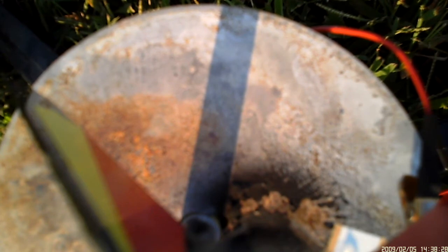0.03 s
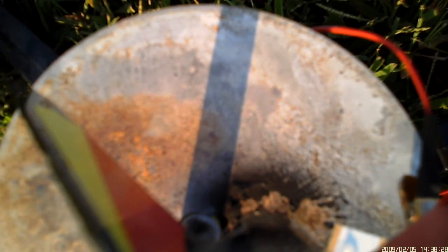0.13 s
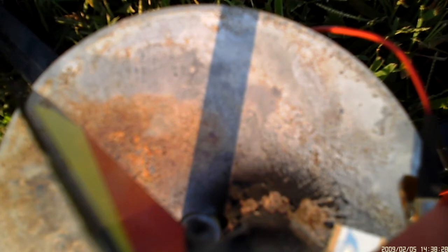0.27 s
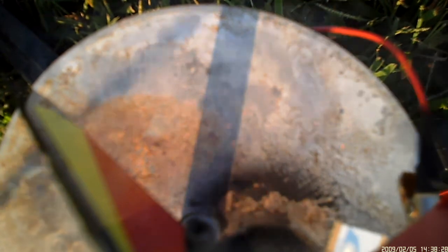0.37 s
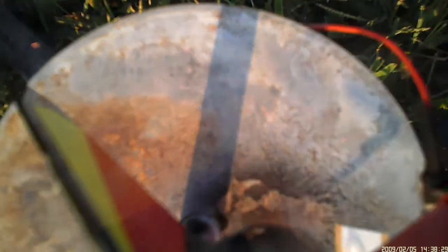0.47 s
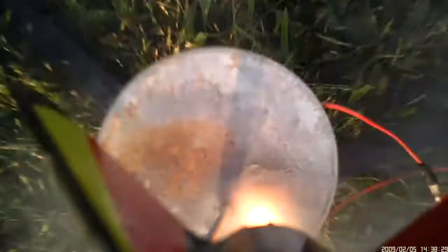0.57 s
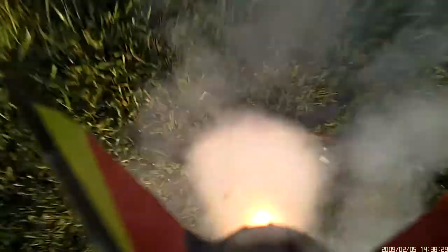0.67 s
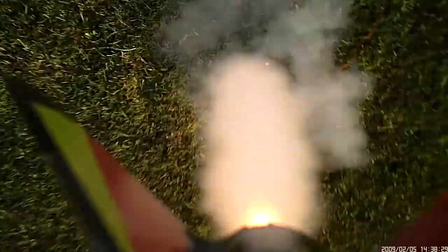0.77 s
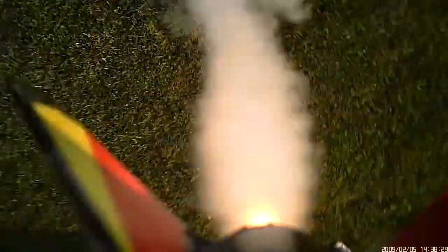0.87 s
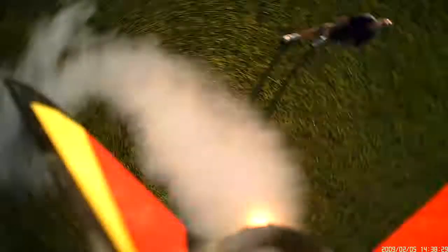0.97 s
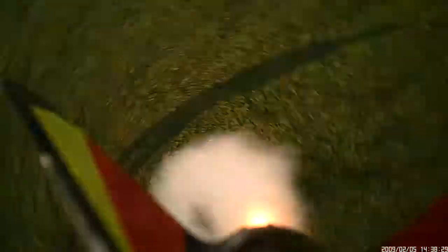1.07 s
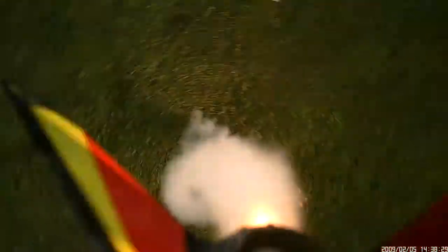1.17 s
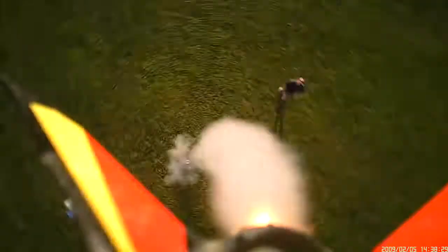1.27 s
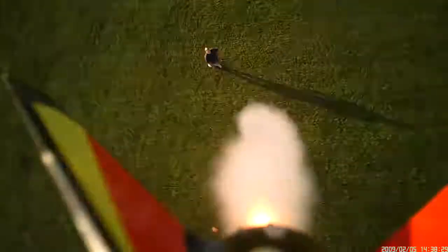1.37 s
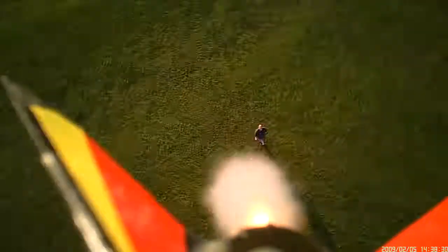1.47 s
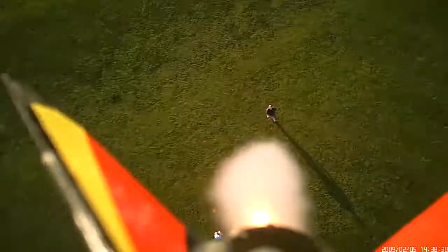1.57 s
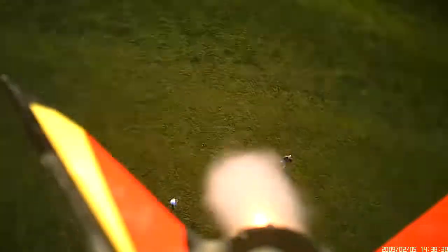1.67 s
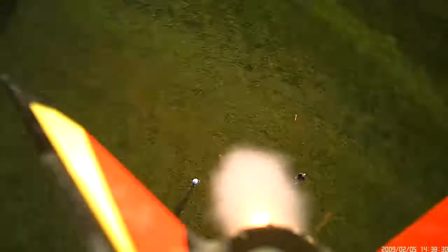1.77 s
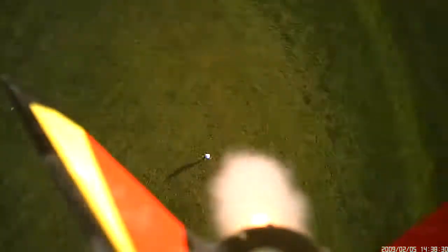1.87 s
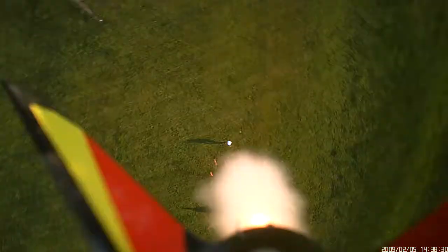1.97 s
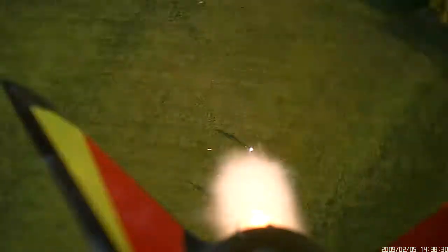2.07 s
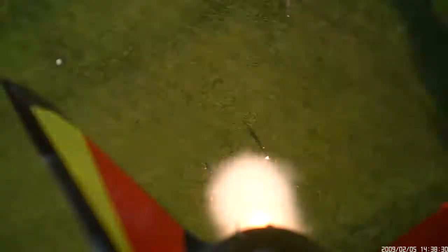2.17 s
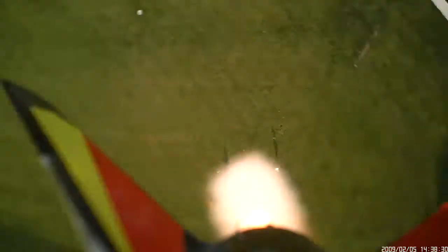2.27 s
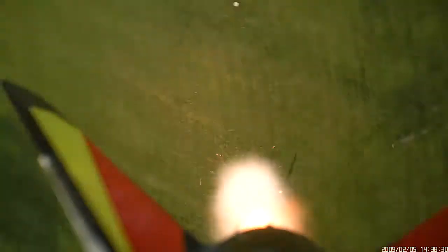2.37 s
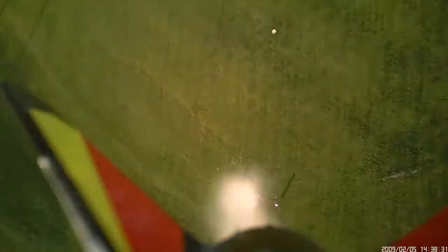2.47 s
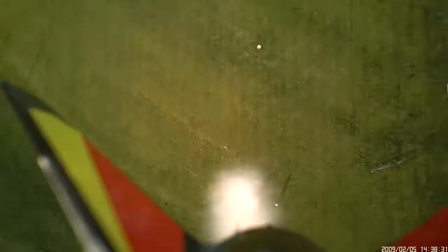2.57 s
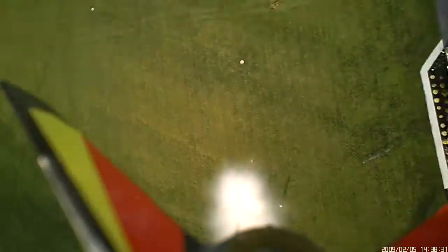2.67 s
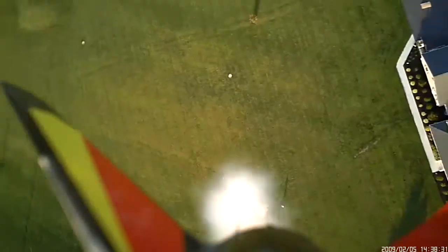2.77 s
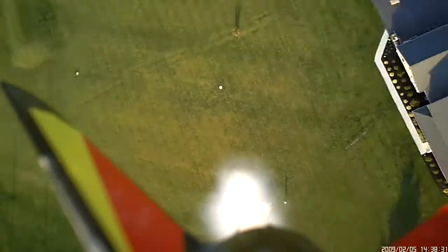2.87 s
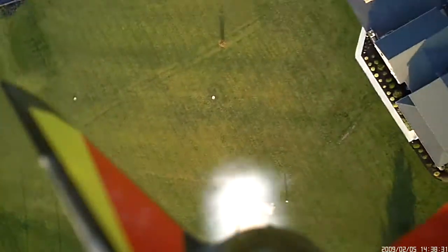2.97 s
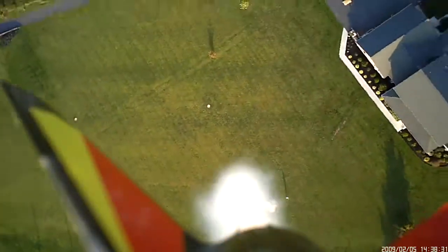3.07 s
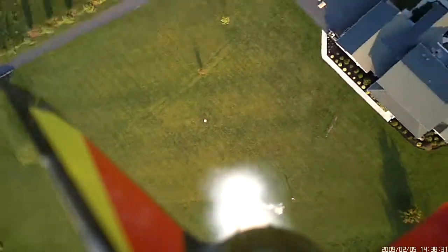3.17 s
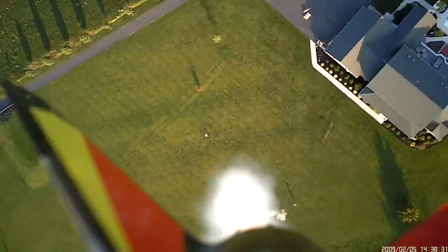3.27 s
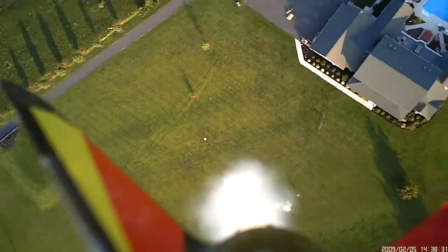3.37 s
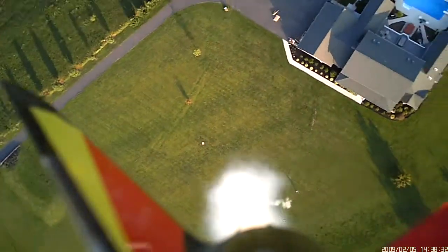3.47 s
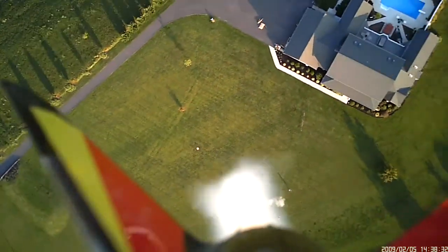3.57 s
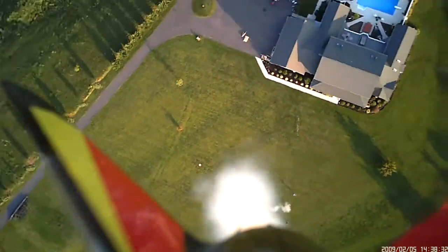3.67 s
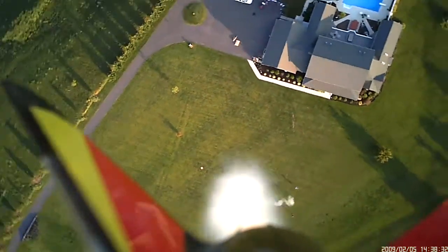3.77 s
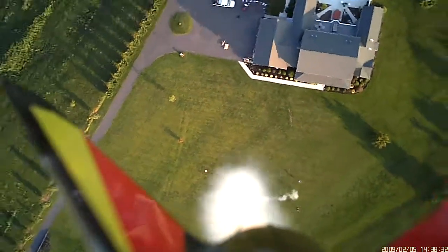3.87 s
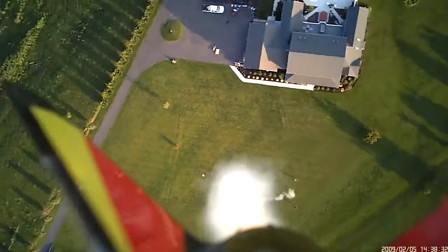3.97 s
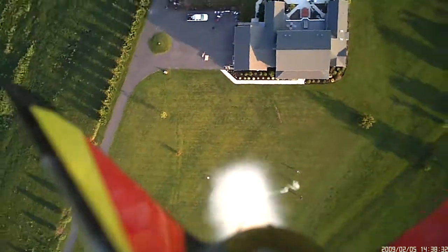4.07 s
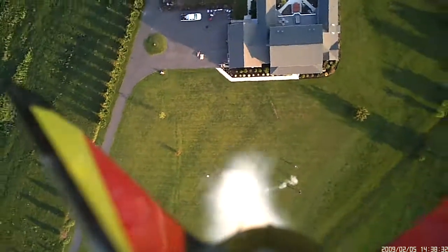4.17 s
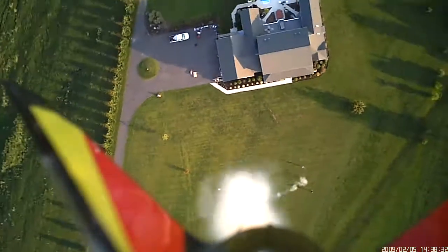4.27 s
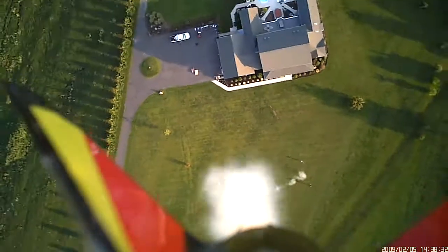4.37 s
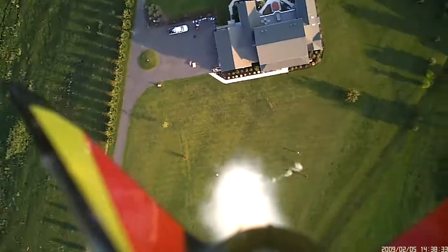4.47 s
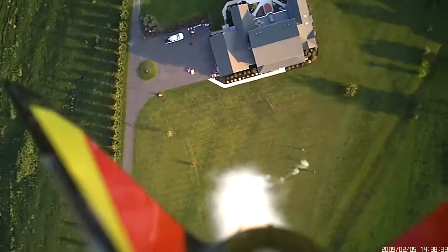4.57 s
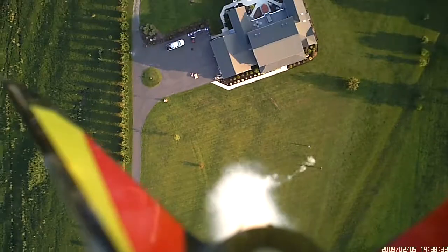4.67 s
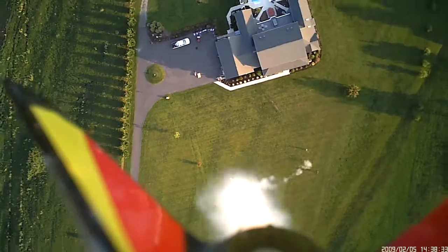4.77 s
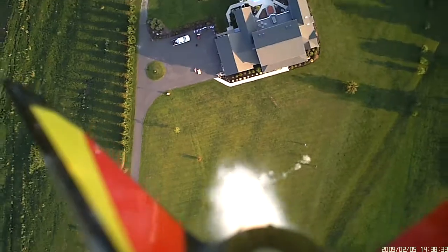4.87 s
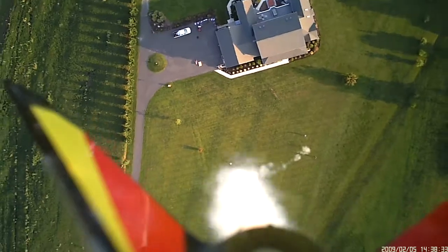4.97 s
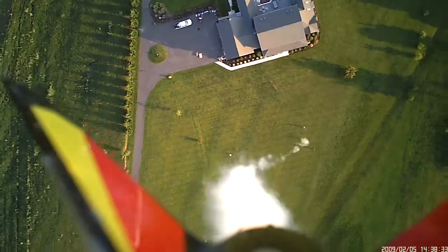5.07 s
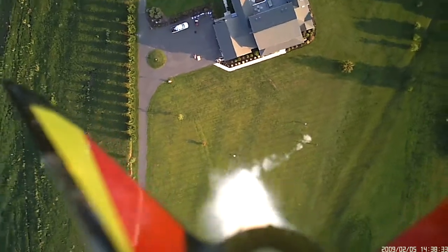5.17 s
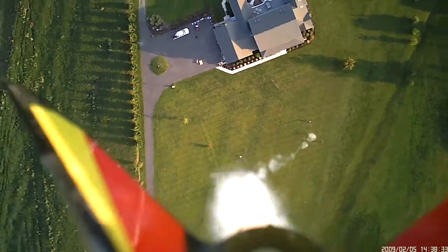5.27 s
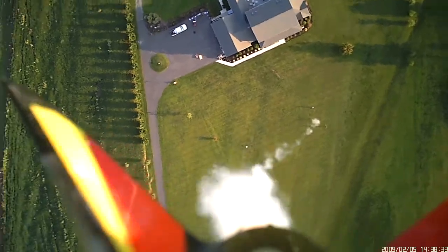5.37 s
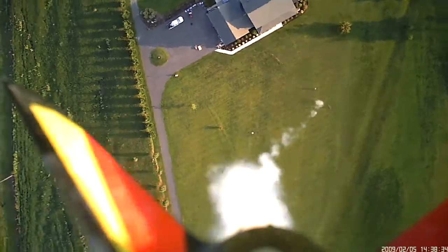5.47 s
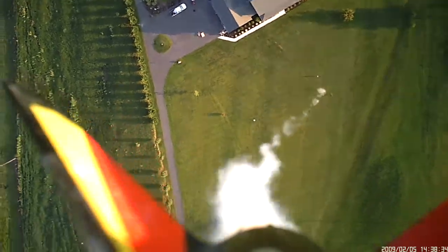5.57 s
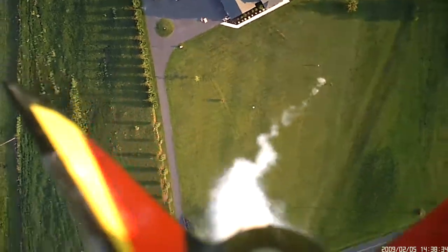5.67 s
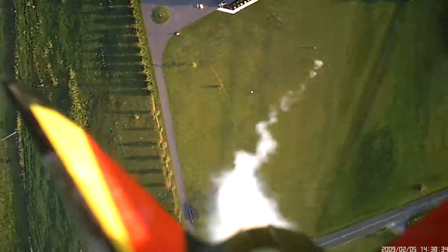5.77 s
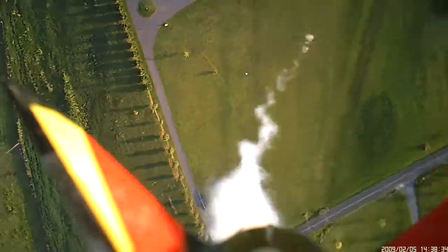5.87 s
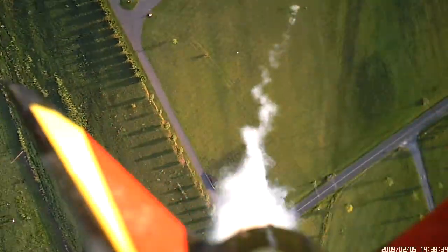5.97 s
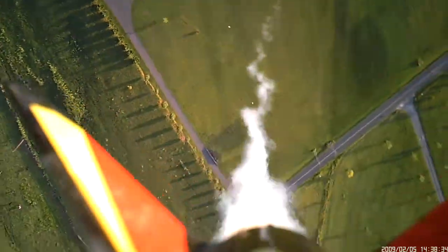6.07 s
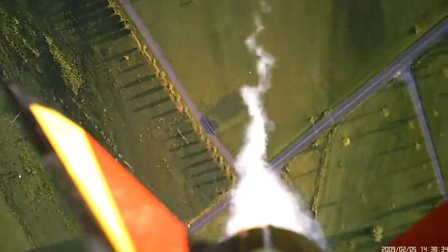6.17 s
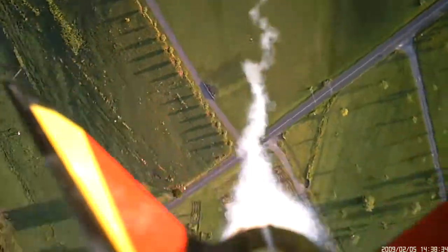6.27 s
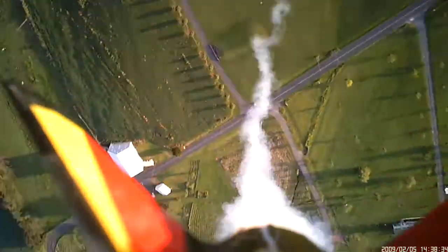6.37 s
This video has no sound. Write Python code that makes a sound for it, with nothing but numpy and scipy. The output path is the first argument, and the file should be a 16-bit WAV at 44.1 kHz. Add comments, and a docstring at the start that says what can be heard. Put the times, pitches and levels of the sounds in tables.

```python
"""A model rocket's jet hisses through the case of a small camera taped to its body, as resonantly shaped noise.
First the igniter spits, then the motor pops and rings the steel blast plate as decaying sinusoids.
The plume adds dull noise from the ground; air over the microphone swells as turbulence noise with airspeed.
That roar overloads the input stage, then dulls to buffeting as the climb slows and the rocket leans;
gusts, a pressure surge and a faint hiss complete the scene."""
import sys
import numpy as np
from scipy import signal
from scipy.fft import rfft, irfft
from scipy.io import wavfile
from scipy.ndimage import uniform_filter1d

SR = 44100
rng = np.random.default_rng(int(sys.argv[2]) if len(sys.argv) > 2 else 0)


def master_out(mix):
    """Clip the mix to full scale and print it as 16-bit PCM to the path in sys.argv[1]."""
    frames = np.transpose(np.atleast_2d(mix))
    ceiling = np.clip(frames, -1, 1)
    pcm = np.round(ceiling * 32767).astype(np.int16)
    wavfile.write(sys.argv[1], SR, pcm)


N = 283033
TIME = np.arange(N) / SR
FRAME_S = np.arange(N // 256 + 5) * 256 / SR
BIN_HZ = np.fft.rfftfreq(1024, 1 / SR)

IGNITION_S = 0.326
CATCH_S = 0.0069  # the flame takes hold this long before the pop

# the jet heard directly at rest, and its change in level at reference airspeed
JET_DB, SWEPT_DB = -14, -98
# the jet reflected by the blast plate, until the rocket clears it
PLATE_DB, PLATE_FADE_FROM_S, PLATE_GONE_S = 1, 0.656, 0.657
# the jet reflected by the ground, fading with height
GROUND_DB, GROUND_FADE_FROM_S, GROUND_GONE_S = -8, 1.44, 3.83
# brightness in dB per octave; the first leak of gas is thinner than the flame by an extra tilt
PAD_TILT_DB, FLIGHT_TILT_DB, LEAK_TILT_DB = 1.5, -0.29, 6.5

# air resonances of the camera's case: centre_hz, width_hz, pad_db (over the plate), flight_db
CASE_RESONANCES = [(600, 900, -12, -12), (1550, 620, -1, -4), (3250, 500, -9, -6), (3950, 500, 1, 2),
                   (4600, 500, -18, -12), (5600, 500, -14, -13), (7080, 750, -3, -7), (8200, 850, -11, -13),
                   (11400, 2100, -19, -14), (13950, 850, -12, -16), (14900, 900, -22, -25)]
# change from the plate's reflected sound to direct sound: time_s, share of free flight (0-1)
FREE_FLIGHT = [(.6, 0), (1.6, 1)]
# flares of the flame as thrust peaks: centre_s, level_db, length_s, brightness (dB per octave)
FLAME_FLARES = [(.467, -3, 0.014, 1), (0.548, 2.5, 0.0252, 7), (0.596, 7, 0.0297, -2)]


def jet(sputter_db=0.04):
    """Resonant filtering: broadband exhaust noise takes on the case's resonances and an uneven burn."""
    direct = gain_of(JET_DB + SWEPT_DB * speed(TIME))
    plate = gain_of(PLATE_DB) * (1 - ramp(TIME, PLATE_FADE_FROM_S, PLATE_GONE_S))
    ground = gain_of(GROUND_DB) * (1 - ramp(TIME, GROUND_FADE_FROM_S, GROUND_GONE_S))
    path_gain = np.sqrt(direct ** 2 + plate ** 2 + ground ** 2)  # incoherent paths add in power

    aloft = follow(FREE_FLIGHT, FRAME_S)[:, None]
    power = 0
    for centre_hz, width_hz, pad_db, flight_db in CASE_RESONANCES:
        peak = gain_of(pad_db + aloft * (flight_db - pad_db))
        # half power lies about 0.43 widths from the centre
        power = power + peak ** 2 / (1 + (1.497 * (BIN_HZ - centre_hz) / width_hz) ** 2) ** 2
    case = np.sqrt(power) * hollows()

    leaking = 1 - ramp(FRAME_S, IGNITION_S - CATCH_S, IGNITION_S)[:, None]
    tilt_db = PAD_TILT_DB + aloft * (FLIGHT_TILT_DB - PAD_TILT_DB) + leaking * LEAK_TILT_DB
    octaves = np.log2(np.maximum(BIN_HZ, 500) / 4000)
    hiss = noise(case * gain_of(tilt_db * octaves)) * thrust() * path_gain

    flares = 0
    for centre_s, level_db, length_s, bright_db in FLAME_FLARES:
        flare = noise(case * gain_of(bright_db * octaves))
        flares = flares + flare * swell(centre_s, level_db, length_s)
    return (hiss + flares) * gain_of(sputter_db * waver(20.0, 120))


# spits of the igniter: start_s, level_db
IGNITER_SPITS = [(0.3126, -23), (0.3124, -22.5), (.317, -19.5), (0.32, -1.5), (0.322, -11)]
# spectrum of the spits' sizzle: frequency_hz, level_db
SIZZLE_SPECTRUM = [(100, -8.5), (900, -24.5), (1550, 5), (2600, -25.5), (3700, -20), (5000, -22), (7000, 2),
                   (10000, -20), (12500, 3), (14200, 4), (15500, -5)]


def igniter(spit_t60=0.011):
    """Impulsive excitation: each spit is a burst of sizzling noise with exponential decay."""
    envelope = sum(dying(start_s, level_db, spit_t60) for start_s, level_db in IGNITER_SPITS)
    return noise(colour(SIZZLE_SPECTRUM)) * envelope


# spectrum of the pop of ignition: frequency_hz, level_db
POP_SPECTRUM = [(40, 1.5), (150, 6), (300, -22.5), (1500, 9.5), (2400, -4), (3400, 2), (7000, -8.5),
                (15000, -32.5)]


def ignition_pop(pop_db=5, pop_t60=0.063):
    """Blast noise: the propellant catches with a short, exponentially decaying burst."""
    return noise(colour(POP_SPECTRUM)) * dying(IGNITION_S, pop_db, pop_t60)


# modes of the steel blast plate: pitch_hz, level_db, t60_s
PLATE_MODES = [(2900, -4, 0.09), (3030, -13.5, 0.157), (3443, -0.5, 0.0652), (4030, -19.5, 0.1113),
               (7640, -23.5, 0.13)]


def plate_ring():
    """Modal vibration: the blast sets off the plate's modes, each a damped sinusoid."""
    ring = 0
    for pitch_hz, level_db, t60_s in PLATE_MODES:
        tone = np.sin(2 * np.pi * pitch_hz * (TIME - IGNITION_S))
        ring = ring + dying(IGNITION_S, level_db, t60_s) * tone
    return ring


# the plume's level: rises to its peak as the rocket lifts, then falls behind
PLUME_PEAK_S, PLUME_DB, PLUME_PAD_DB = 0.98, -1.5, -10
PLUME_RISE_DB_PER_S, PLUME_FADE_DB_PER_S, PLUME_CORNER_HZ = 59, 6, 1117


def plume(steepness=2.48, rumble_db=-16):
    """Turbulent mixing noise: the plume spreads over the ground with a dull roar and a rumble."""
    rising_db = np.maximum(PLUME_DB - PLUME_RISE_DB_PER_S * (PLUME_PEAK_S - TIME), PLUME_PAD_DB)
    fading_db = PLUME_DB - PLUME_FADE_DB_PER_S * (TIME - PLUME_PEAK_S)
    level_db = np.minimum(rising_db, fading_db)
    roar = noise(port() * hollows() * eddies(PLUME_CORNER_HZ, steepness))
    rumble = gain_of(rumble_db) * noise(large_eddies())
    return (roar + rumble) * gain_of(level_db) * thrust() ** 3


# a leak swells up to ignition, the flame smoulders, then pressure builds to full thrust
LEAK_DB, LEAK_DB_PER_S = -27.5, 560
SMOULDER_DB, BUILD_FROM_S, FULL_THRUST_S = -15.5, 0.3505, 0.555


def thrust():
    """Source strength: the burn's amplitude, 1 at full thrust, scales the sounds it drives."""
    leak = gain_of(LEAK_DB - LEAK_DB_PER_S * np.maximum(IGNITION_S - TIME, 0))
    burn = gain_of(SMOULDER_DB * (1 - ramp(TIME, BUILD_FROM_S, FULL_THRUST_S)))
    return np.maximum(leak, burn * ramp(TIME, IGNITION_S - CATCH_S, IGNITION_S))


# notches cut by reflections inside the case: centre_hz, width_hz, depth_db
CASE_NOTCHES = [(2620, 300, -4), (6120, 220, -8), (7760, 180, -5), (9650, 400, -9), (12950, 400, -11)]


def hollows():
    """Destructive interference: reflections inside the case cut dips into the spectrum."""
    return gain_of(bell_db(CASE_NOTCHES))


# air over the microphone at reference airspeed; pressure goes with a power of speed
ROAR_DB, ROAR_POWER, REFERENCE_CORNER_HZ = 9.5, 2.135, 4845
BUFFET_DB, BUFFET_POWER = 3.5, 2.19
SHAKE_DB = -25  # shaking of the airframe by the motor
# vortices shed by the body: a low hump whose pitch goes with airspeed
SHEDDING_HZ, SHEDDING_DB, SHEDDING_OCTAVES = 227.7, 4.5, 0.52

# breathy overtones of air blowing across the port: centre_hz, width_hz, level_db
PORT_OVERTONES = [(7705, 475, 5.5), (9700, 730, 3), (14200, 1230, 0)]


def airflow(steepness=2.68, lumps_db=0.5, patchy_db=-0.16):
    """Aerodynamic noise: faster air raises both the level and the corner of the turbulence spectrum."""
    fast, frame_fast = speed(TIME), speed(FRAME_S)[:, None]
    small_eddies = eddies(REFERENCE_CORNER_HZ * frame_fast, steepness)
    detail_db = bell_db(PORT_OVERTONES) + patchy_db * patches()
    roar = noise(port() * small_eddies * gain_of(detail_db))

    octaves_off = np.log2((BIN_HZ + 1) / (SHEDDING_HZ * frame_fast))
    shedding_db = SHEDDING_DB * np.exp(-(octaves_off / SHEDDING_OCTAVES) ** 2 / 2)
    buffet = noise(large_eddies() * gain_of(shedding_db))

    roar_gain = gain_of(ROAR_DB) * fast ** ROAR_POWER
    buffet_gain = np.hypot(gain_of(BUFFET_DB) * fast ** BUFFET_POWER, gain_of(SHAKE_DB))
    air = roar_gain * roar + buffet_gain * buffet
    return air * thrust() ** 2 * gain_of(lumps_db * waver(7.7, 90))


# late in the climb the rocket leans over; LEAN_DB holds at LEAN_SPEED once the lean is full
LEAN_FROM_S, LEAN_FULL_S, LEAN_DB = 4.456, 6.138, -15
LEAN_SPEED, LEAN_POWER, LEAN_CORNER_RATIO, LEAN_BUFFET_DB = 0.1683, 1, 0.656, -2


def crosswind(steepness=1.566, lumps_db=0.88, hump_db=7, hump_octaves=0.65):
    """Speed-scaled turbulence: air from the side roars, dull and lumpy, lower as the climb slows."""
    corner_hz = LEAN_CORNER_RATIO * REFERENCE_CORNER_HZ * speed(FRAME_S)[:, None]
    octaves_off = np.log2((BIN_HZ + 1) / corner_hz)
    hump = gain_of(hump_db * np.exp(-(octaves_off / hump_octaves) ** 2 / 2))
    roar = noise(port() * hollows() * eddies(corner_hz, steepness) * hump)
    air = roar + gain_of(LEAN_BUFFET_DB) * noise(large_eddies())
    lean = ramp(TIME, LEAN_FROM_S, LEAN_FULL_S)
    strength = lean * (speed(TIME) / LEAN_SPEED) ** LEAN_POWER
    return air * strength * gain_of(LEAN_DB + lumps_db * waver(7.8, 87))


# airspeed of the climb: time_s, share of reference airspeed (0-1)
AIRSPEED = [(.6, 0), (.9, 0), (1.12, 0.15), (1.3, 0.62), (1.8, 0.8), (2.15, 0.97), (2.7, 0.81), (3.1, 0.67),
            (3.8, 0.47), (4.45, 0.32), (4.9, 0.26), (5.45, 0.19), (5.85, 0.11), (6.42, .06)]


def speed(s):
    """Flow velocity: the share of reference airspeed at the times s governs the wind sounds."""
    return np.maximum(follow(AIRSPEED, s), 0.001)


# turbulence as the microphone's port passes it: frequency_hz, level_db
PORT_SPECTRUM = [(20, -2.5), (150, -6), (500, -3), (1100, -0.5), (1600, 1.5), (1980, -2.5), (2300, -8),
                 (2850, -11), (3850, -2), (4700, -7.5), (6600, -5.5), (7700, -5), (8700, -8), (14500, -9.5)]


def port():
    """Transmission response: the port passes some frequencies of turbulence better than others."""
    return colour(PORT_SPECTRUM)


# large eddies shaking the camera: frequency_hz, level_db
BUFFET_SPECTRUM = [(15, 1), (40, -3), (90, -5), (180, -9), (300, -10.5), (600, -21.5), (2000, -73.5),
                   (8000, -90)]


def large_eddies():
    """Low-frequency turbulence: large eddies hold most of their strength in the bass."""
    return colour(BUFFET_SPECTRUM)


def eddies(corner_hz, steepness, smallest_eddy=9.4):
    """Turbulent cascade: flat to the corner, falling above, cut off at a multiple of the corner."""
    ratio = BIN_HZ / corner_hz
    return np.exp(-(ratio / smallest_eddy) ** 2) / np.sqrt(1 + ratio ** steepness)


# single hard gusts: centre_s, level_db, length_s
GUST_HITS = [(1.007, -9.5, 0.04), (5.556, -19.5, 0.041), (5.749, -9, 0.008111), (5.82, -12, 0.0214),
             (6.073, -18, 0.0147)]


def gusts(corner_hz=300):
    """Transient pressure loading: large eddies hit the port one at a time, each a dull thump."""
    envelope = sum(swell(*row) for row in GUST_HITS)
    return envelope * noise(1 / (1 + (BIN_HZ / corner_hz) ** 4))


def surge(centre_s=0.959, width_s=0.015, push_db=1.5):
    """Bipolar pressure pulse: leaving the pad, suction then pressure pushes the microphone to its limits."""
    u = (TIME - centre_s) / width_s
    swing = np.tanh(8 * u) * np.exp(-u ** 2 / 4)
    return gain_of(push_db) * swing * (1 - 0.25 * np.tanh(u))  # suction is the stronger half


# quiet air and microphone hiss: frequency_hz, level_db
FLOOR_SPECTRUM = [(10, 3), (30, -3.5), (100, -14.5), (300, -21.5), (1000, -26), (3000, -32.5), (6000, -37),
                  (7300, -36), (10000, -39), (14000, -39.5), (16000, -46)]


def background(floor_db=-46):
    """Stationary noise floor: quiet air and the microphone's hiss stay at one level throughout."""
    return gain_of(floor_db) * noise(colour(FLOOR_SPECTRUM))


def gain_of(db):
    """Logarithmic level: decibels to amplitude."""
    return 10 ** (np.asarray(db) / 20)


def evened(x):
    """Power normalization: scales to rms 1."""
    return x / np.sqrt(np.mean(x ** 2) + 1e-20)


def follow(rows, s):
    """Linear interpolation: the value of a two-column curve at the times s."""
    at, value = np.transpose(rows)
    return np.interp(s, at, value)


def colour(points):
    """Spectral envelope: frequency and level points become a gain for each bin."""
    hz, db = np.transpose(points)
    return gain_of(np.interp(np.log(BIN_HZ + 1), np.log(hz), db))


def bell_db(rows):
    """Resonance curves: the sum in dB of bells given by centre, width and height."""
    return sum(db / (1 + (2 * (BIN_HZ - hz) / width) ** 2) for hz, width, db in rows)


def noise(shape):
    """Filtered Gaussian noise: rms 1 overall, with a fixed or changing spectrum of steady power."""
    real, imaginary = rng.standard_normal((2, len(FRAME_S), len(BIN_HZ)))
    shape = shape / np.linalg.norm(shape, axis=-1, keepdims=True)
    spectrum = ((real + 1j * imaginary) * shape).T
    return evened(signal.istft(spectrum, nperseg=1024, noverlap=768)[1][:N])


def waver(slow_hz, fast_hz):
    """Pink fluctuation: random swings of rms 1, about equal in each octave between two rates."""
    hz = np.fft.rfftfreq(N, 1 / SR) + 1e-6
    band = (hz > slow_hz) / np.sqrt(hz * (1 + (hz / fast_hz) ** 4))
    return evened(irfft(rfft(rng.standard_normal(N)) * band, N))


def patches(frames=14, bins=10):
    """Correlated randomness: a smooth field over time and frequency, rms 1."""
    field = rng.standard_normal((len(FRAME_S), len(BIN_HZ)))
    smooth_in_time = uniform_filter1d(field, frames, 0)
    return evened(uniform_filter1d(smooth_in_time, bins, 1))


def dying(start_s, db, t60):
    """Exponential decay: an envelope that jumps up and falls 60 dB in t60 seconds."""
    return gain_of(db - 60 * np.maximum(TIME - start_s, 0) / t60) * (TIME >= start_s)


def swell(s, db, length):
    """Gaussian envelope: a bell around the time s whose standard deviation is its length."""
    return gain_of(db) * np.exp(-((TIME - s) / length) ** 2 / 2)


def ramp(s, from_s, to_s):
    """Raised-cosine transition: a smooth step from 0 to 1."""
    return (1 - np.cos(np.pi * np.clip((s - from_s) / (to_s - from_s), 0, 1))) / 2


def scene():
    """Superposition: all pressures add at one microphone, feeding two identical channels."""
    motor = jet() + igniter() + ignition_pop() + plate_ring() + plume()
    wind = airflow() + crosswind() + gusts() + surge()
    pressure = motor + wind + background()
    return np.array([pressure, pressure])


def record(dry, ceiling=0.6314, knee=10, leak_hz=3.0, edge_hz=15750):
    """Saturation and filtering: a tight-kneed overload, a leak of steady pressure, then a band limit."""
    fine = signal.resample_poly(dry, 2, 1, axis=1)  # oversampling limits aliasing
    limited = fine / (1 + np.abs(fine / ceiling) ** knee) ** (1 / knee)
    clipped = signal.resample_poly(limited, 1, 2, axis=1)
    coupled = signal.lfilter(*signal.butter(1, leak_hz, "high", fs=SR), clipped)
    lowpass = signal.firwin(511, edge_hz, window=("kaiser", 9), fs=SR)
    return signal.oaconvolve(coupled, lowpass[None], "same")


dry = scene()
out = record(dry)
master_out(out)
```